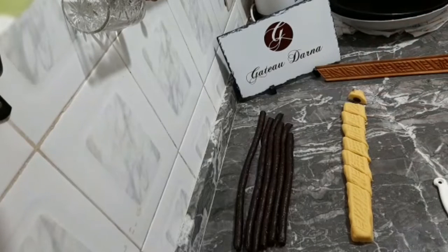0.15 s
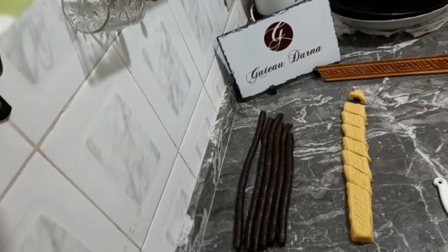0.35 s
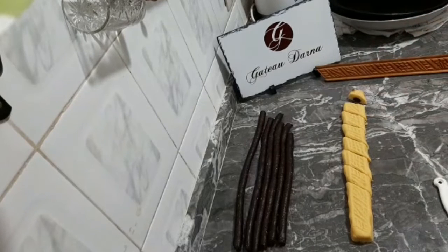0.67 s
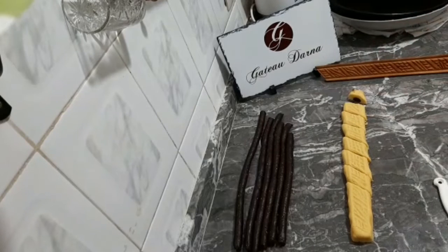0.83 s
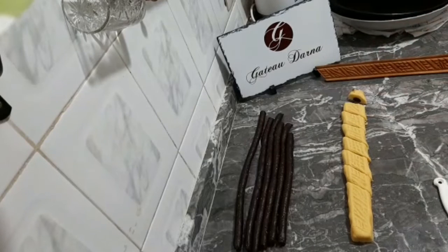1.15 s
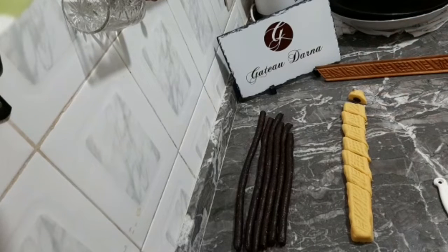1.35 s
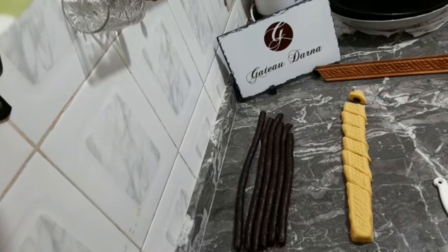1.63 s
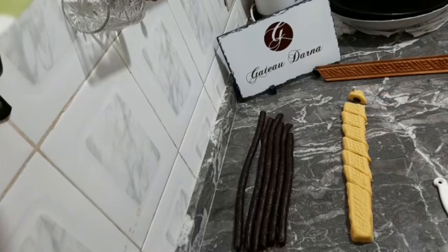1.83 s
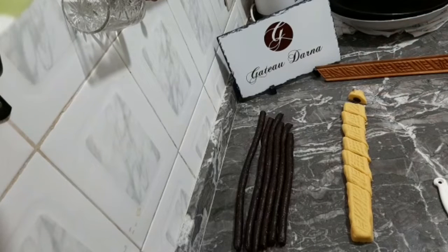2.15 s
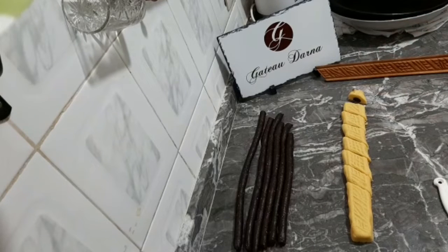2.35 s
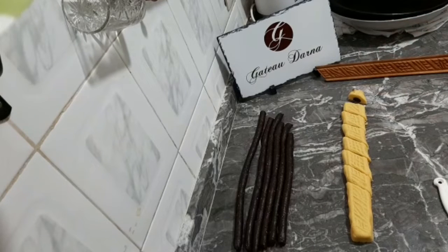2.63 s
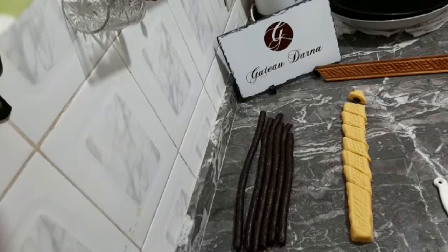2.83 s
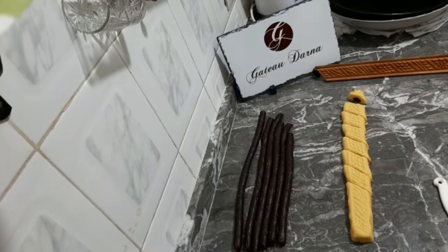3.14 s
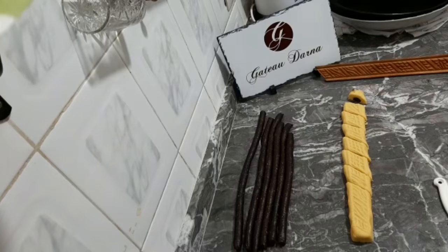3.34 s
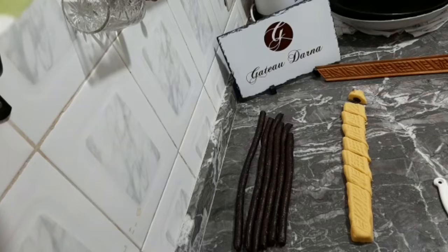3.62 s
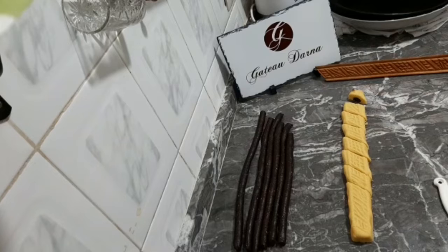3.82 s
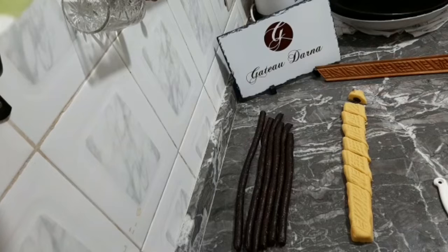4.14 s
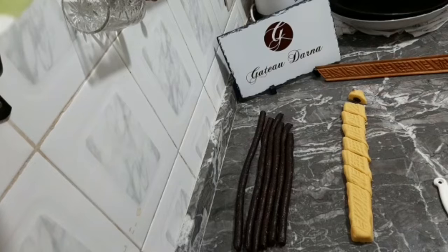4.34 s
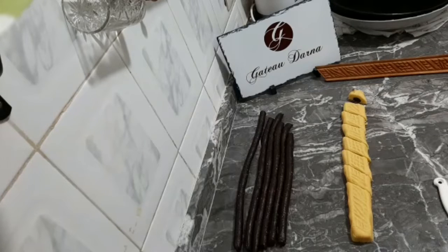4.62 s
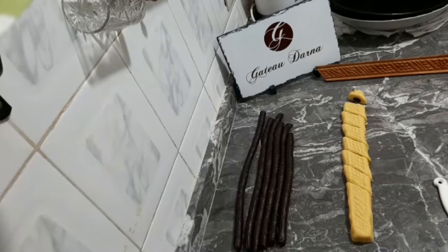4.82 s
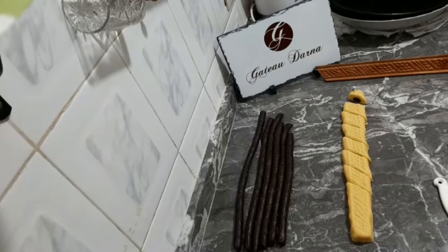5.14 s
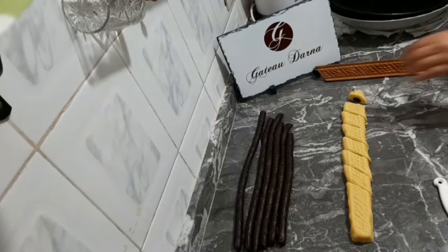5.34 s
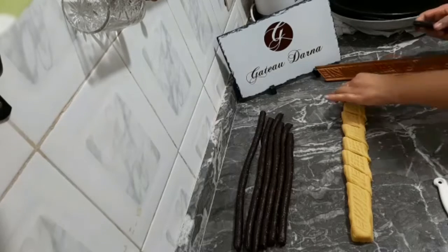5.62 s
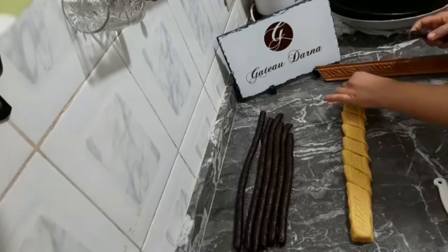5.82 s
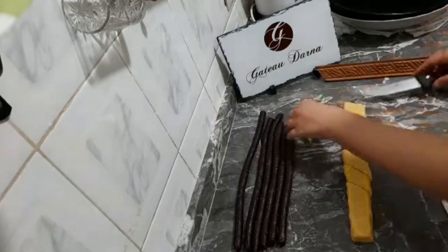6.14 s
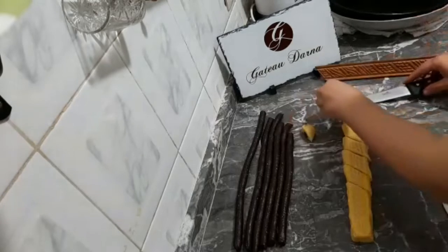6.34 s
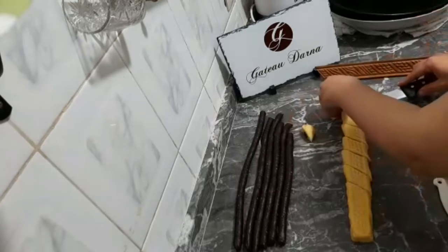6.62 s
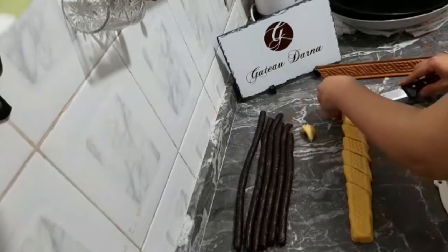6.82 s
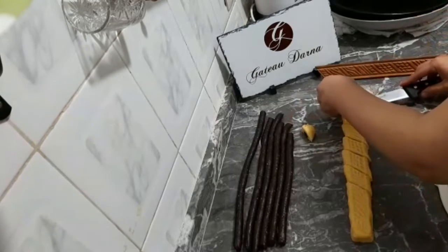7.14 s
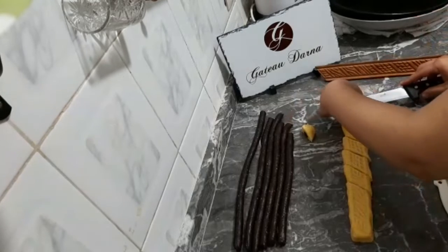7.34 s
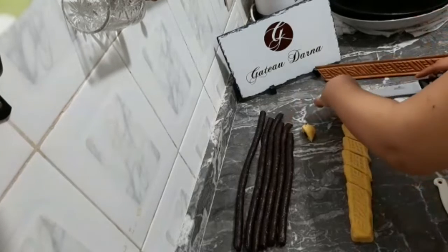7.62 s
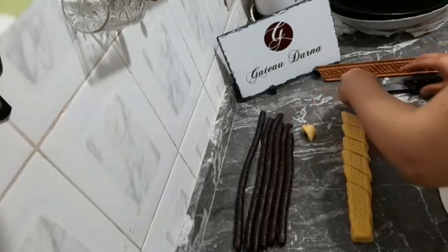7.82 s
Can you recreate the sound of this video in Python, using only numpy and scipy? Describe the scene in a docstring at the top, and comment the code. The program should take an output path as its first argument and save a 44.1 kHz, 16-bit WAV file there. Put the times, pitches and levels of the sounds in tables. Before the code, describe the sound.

For the first second, hands softly brush and bump things on a stone counter. At about 1.5 seconds a wooden cupboard knocks and slides open with a scraping rumble and a thin squeak, banging loudly on its stop at 2.3 seconds, the panels ringing hollowly. Around 2.9 seconds things shift inside with a duller knock and more scraping. From 3.8 seconds it rumbles shut on sticking runners, clattering and briefly squeaking, and bangs loudly again at 4.7 seconds. From 5 seconds it is much quieter: close by, hands rustle over the counter with a couple of tiny bumps. A knife cutting dough clicks lightly on the stone at about 6.5, 7.1 and 7.4 seconds, and its handle knocks softly near 7.8 seconds. The hard, tiled kitchen rings briefly after everything, heard in stereo over a faint, wavering hum.

```python
"""Hands brush and bump things on a counter, then a wooden kitchen cupboard slides open and bangs on its stop.
Things are shifted inside; it rumbles shut on sticking, slipping runners and bangs again, panels and
carcass ringing. Then, close by, hands rustle over the stone counter and a knife clicks on the stone
as it comes through dough. Heard in a hard, tiled kitchen that rings after everything, over a faint hum,
from a pair of microphones 18 cm apart."""
import sys
import numpy as np
from scipy import signal
from scipy.fft import rfft, irfft
from scipy.io import wavfile
from scipy.ndimage import uniform_filter1d

SR = 44100
rng = np.random.default_rng(int(sys.argv[2]) if len(sys.argv) > 2 else 0)


def output_pcm(signal):
    """Save a mono or channel-first signal as 16-bit PCM at the path in sys.argv[1].

    Samples are clipped to [-1, 1] before scaling.
    """
    pcm = np.clip(np.atleast_2d(signal).T, -1, 1) * 32767
    wavfile.write(sys.argv[1], SR, np.round(pcm).astype(np.int16))


N = 351469
HZ = np.fft.rfftfreq(N, 1 / SR)
TIME = np.arange(N) / SR
USUAL_DB = -43  # an ordinary slide or stroke

# Knocks at the cupboard. Each row: start in seconds, then clack, boom, thud and hardness in relative dB.
CUPBOARD_KNOCKS = [(1.491, -46.5, -59.5, -60, 2), (1.536, -34.5, -36, -46.5, 8.5),
                   (2.085, -39.5, -52.5, -34, 0.5), (2.28, -60, -40, -57.5, -6.5),
                   (2.328, -17, -24, -19, 2), (2.341, -15, -16, -15, -1), (2.907, -27.5, -34, -19.5, -9.5),
                   (2.946, -41, -26, -54, 10), (3.365, -51, -42, -42, 8), (3.775, -44.5, -64, -44.5, -14),
                   (3.942, -29.5, -62, -42.5, -2.5), (3.968, -28.5, -52, -25.5, 1.5),
                   (4.056, -21.5, -55, -21.5, 2.5), (4.394, -25, -32.5, -14.5, -45),
                   (4.437, -30.5, -28.5, -45, 0), (4.472, -22, -26, -21, -3.5),
                   (4.56, -36.5, -27.5, -16, 5.5), (4.721, -18, -31.5, -15, -0.5),
                   (4.73, -21.5, -18, -17.5, -1), (4.762, -37, -15, -13.5, -22.5)]
# The tone of a wooden clack. Each row: frequency in Hz, level in dB.
WOOD_TONE = [(40, -23), (130, -7.5), (220, -8.5), (330, 0), (470, 3), (680, -9), (1000, -9.5),
             (1400, -12.5), (2000, -16), (2800, -22), (4200, -25), (5500, -34.5), (10000, -40),
             (16000, -47)]
def cupboard_knocks():
    """Wood strikes wood; the microphones get far more room than direct sound."""
    return blows(CUPBOARD_KNOCKS, WOOD_TONE, direct=0.2, gain_db=33.5, sizzle_db=-0.5, contact_s=0.0095)


# Modes of the cupboard's carcass and panels. Each row: pitch in Hz, level in dB, 60 dB decay in seconds.
CARCASS_MODES = [(52, -13, .14), (65, -21, .5), (77.37, -2, .85), (92.04, -5.5, .7), (98.45, 2, .6),
                 (104, -7.5, 0.2), (121, -10, 0.6), (145.2, -4, .45), (157.2, -11, .25)]
PANEL_MODES = [(237.4, 9.5, 0.14), (277, -5, 0.35), (298.4, -6, 0.65), (344.2, -3.5, 0.25),
               (384.3, -7.5, 0.6), (400, -6.5, 0.14), (458.7, 0, 0.39), (523, -8.5, 0.54), (832, -8, 0.13),
               (954, -11.5, 0.33), (1078, -14.5, 0.28), (1277, -16, .35), (1830, -28, 0.58),
               (2060, -23.5, 0.14)]
def blows(rows, tone, direct, gain_db, sizzle_db, contact_s, firm_db=-22, dull_s=0.008):
    """Each blow clacks into the room, while the panels thud and the carcass booms."""
    out, hz = np.zeros((2, N)), np.fft.rfftfreq(4096, 1 / SR)
    boom = body(CARCASS_MODES, swell_s=0.003, lag=0.7)
    norm = np.linalg.norm(pulse(curve(tone, hz)))
    for start, db, boom_db, thud_db, hard_db in rows:
        # weak blows stay longer in contact and lose their first tick
        contact = contact_s * amp(firm_db - db) ** 0.57
        room = kitchen(direct * np.exp(-contact / dull_s), contact)
        # hard blows are brighter, in clack and panels alike
        edge = [(380, 0), (1100, hard_db), (3500, hard_db), (9000, sizzle_db + 1.1 * hard_db)]
        clack = pulse(curve(tone, hz) + curve(edge, hz)) / norm
        add(out, start, amp(db + gain_db) * convolve(clack, room))
        panels = [(f, mode_db + curve(edge, f), t60) for f, mode_db, t60 in PANEL_MODES]
        thud = body(panels, swell_s=contact, lag=0.6)
        add(out, start, amp(boom_db) * boom + amp(thud_db - 7) * thud)
    return out


# Modes of the end stop. Each row: pitch in Hz, level in dB, 60 dB decay in seconds.
STOP_MODES = [(147.8, -3, .45), (158.5, -4.5, 0.33), (469, 0, .3), (522.3, -6, .3), (1260, -13.5, .35),
              (1900, -16, .4), (1990, -15.5, .38)]
def end_stop(start=2.337, db=-18):
    """Struck once, at full opening, the stop rings with its own hollow notes."""
    out = np.zeros((2, N))
    add(out, start, amp(db) * body(STOP_MODES, swell_s=0.005, lag=0.7))
    return out


# Three slides: open, eased back, shut.
# Each row: time in seconds, effort in dB, extra weight of the rumble in dB.
SLIDE_MOVES = [
    [(1.485, -48.5, -6.5), (1.55, -37, 2), (1.61, -57.5, 4), (1.72, -47, -3), (1.88, -45, 1),
     (2.08, -42.5, 0.5), (2.13, -46.5, 0.5), (2.23, -49, 5.5), (2.31, -53, -2)],
    [(2.8, -57, 10), (2.835, -42, 2), (2.96, -35, 9.5), (3.05, -46, -3), (3.14, -45.5, 1),
     (3.24, -53, -1.5), (3.4, -58.5, 10), (3.5, -67, 18.5), (3.6, -89, 4.5)],
    [(3.66, -89, 24.5), (3.785, -55.5, 16), (3.85, -63, 3), (3.925, -49.5, 0), (3.965, -39, 12.5),
     (4.035, -44, 12), (4.08, -26.5, 8), (4.16, -53.5, 10), (4.26, -43.5, 5.5), (4.4, -38, 2),
     (4.47, -30.5, 8), (4.53, -40.5, 10), (4.6, -43, 3.5), (4.71, -56, 4)],
]
# The tone of the runners. Each row: frequency in Hz, level in dB.
RUNNER_TONE = [(70, -35.5), (130, -4), (220, -9), (340, -0.5), (450, -5.5), (600, -4), (900, -7.5),
               (1400, -7.5), (2000, -12.5), (2800, -15.5), (4700, -19), (7000, -25.5), (10000, -27.5),
               (15500, -34.5)]
def sliding():
    """Wood drags on its runners: rumble, scrape and hiss grow with effort, and squeaks break through."""
    rumble, scrape, hiss = gains = np.zeros((3, N))
    for move in SLIDE_MOVES:
        times, effort, weight = np.transpose(move)
        levels = [effort + weight - 3, effort - 1, -55 + 0.93 * (effort - USUAL_DB)]
        gains += amp([np.interp(TIME, times, db, left=-np.inf, right=-np.inf) for db in levels])
    return box_groan(rumble) + squeaks() + friction(
        [rumble, scrape, hiss], [900, 6000], RUNNER_TONE,
        slips_per_s=700, spread_db=3.5, gain_db=0.5, direct=0.2, judder_db=2.5)


# Modes of the panels, shaken by the sliding. Each row: pitch in Hz, level in dB, 60 dB decay in seconds.
SHAKEN_PANEL_MODES = [(335.2, -5.5, 0.25), (387.5, -0.5, 0.099), (460, -7.5, 0.096), (564, 1.5, 0.16),
                      (686, -6.5, 0.11)]
def box_groan(rumble):
    """The sliding keeps the carcass shaking and sets the panels groaning."""
    out = np.zeros((2, N))
    for modes, db in [(CARCASS_MODES, -10), (SHAKEN_PANEL_MODES, -4)]:
        shake = rng.standard_normal(N) * rumble
        response = body(modes, swell_s=0.01, lag=0.67)
        out += amp(db) * convolve(shake, response / np.linalg.norm(response[0]))
    return out


# Thin squeaks at the runners. Each row: start and length in seconds, pitch and width in Hz, level in dB.
RUNNER_SQUEAKS = [(1.705, 0.12, 10250, 1100, -54), (3.765, 0.079, 5100, 500, -60),
                  (3.933, 0.026, 8900, 300, -52.5), (4.057, 0.027, 4600, 300, -36.5),
                  (4.435, 0.054, 15200, 600, -49)]
def squeaks():
    """Stick-slip chatter in one narrow resonance of a runner."""
    out = np.zeros((2, N))
    for start, length, hz, width, db in RUNNER_SQUEAKS:
        size = round(length * SR)
        resonance = 1 / (1 + ((np.fft.rfftfreq(SR, 1 / SR) - hz) / width) ** 2)
        chatter = unit(irfft(rfft(rng.standard_normal(SR)) * resonance))
        squeak = chatter[:size] * signal.windows.tukey(size, 0.4)
        add(out, start, amp(db) * convolve(squeak, kitchen(direct=0.28)))
    return out


# Bumps at the counter. Each row: start in seconds, then clack, boom, thud and hardness in relative dB.
COUNTER_BUMPS = [(.002, -38, -61, -54, -3.5), (.18, -46.5, -85, -55, -1), (.69, -46.5, -68.5, -49, -0.5),
                 (5.674, -52, -84, -76, -10), (6.033, -54, -87, -78, 8), (7.847, -45, -96, -72, 4)]
# The tone of a bump. Each row: frequency in Hz, level in dB.
COUNTER_TONE = [(30, -45), (60, -23), (180, 2.5), (320, 10), (600, 13.5), (1000, 4.5), (1400, 8.5),
                (2200, 0), (3600, -8), (6000, -1.5), (16000, -5)]
def counter_bumps():
    """Things bump lightly on the stone, and the cupboard answers faintly."""
    return blows(COUNTER_BUMPS, COUNTER_TONE, direct=0.28, gain_db=32, sizzle_db=-17, contact_s=0.0027)


# Cuts, close to the microphones. Each row: start in seconds, ring and click in relative dB,
# direct sound as a ratio to the room, tilt of the ring in dB per octave.
KNIFE_CUTS = [(6.48, -49.5, -51, 0.5, 3.5), (7.113, -48, -40, .1, -4.5), (7.405, -42.5, -43.5, 0.19, 2.5)]
# The tone of the click on stone. Each row: frequency in Hz, level in dB.
CLICK_TONE = [(88, -64), (150, -8), (230, -24), (346, 0.5), (572, -51), (681, -16), (1450, 3.5),
              (1870, -14.5), (2860, 3.5), (3620, -4), (4750, -1), (7130, -0.5), (9180, 1), (15500, -12)]
# Modes of blade and handle. Each row: pitch in Hz, level in dB, 60 dB decay in seconds.
BLADE_MODES = [(1364, -6, .015), (2820, -7, 0.076), (3260, -17, 0.057), (3520, -8.5, 0.049),
               (4910, -2.5, 0.023), (6380, 0, 0.021), (6700, 1.5, 0.02), (7430, -3.5, .025),
               (7890, -5.5, 0.017), (9200, -16, .01), (11500, -14, .01), (13750, -11, .005)]
HANDLE_MODES = [(353, -18, 0.052), (1314, -3, 0.038), (2390, -1, 0.021), (2950, 0, 0.022),
                (3490, 5.5, 0.016), (4500, -7, 0.022)]
def knife(gain_db=33, handle_s=7.848, handle_db=-44.5):
    """The blade clicks on the stone, each angle colouring its brief ring; then the handle knocks."""
    out = np.zeros((2, N))
    click = pulse(curve(CLICK_TONE, np.fft.rfftfreq(16384, 1 / SR)))
    click /= np.linalg.norm(click)
    for start, ring_db, click_db, direct, tilt in KNIFE_CUTS:
        blade = ring([(hz, db + tilt * np.log2(hz), t60) for hz, db, t60 in BLADE_MODES], size=8192)
        hit = amp(ring_db) * blade / np.linalg.norm(blade) + amp(click_db) * click
        add(out, start, convolve(hit, kitchen(direct, early=0.35)))
    handle = ring(HANDLE_MODES, size=8192)
    handle *= amp(handle_db) / np.linalg.norm(handle)
    add(out, handle_s, convolve(handle, kitchen(direct=0.15)))
    return amp(gain_db) * out


# Strokes over the counter, close by.
# Each row: start and length in seconds, level in dB, hiss in dB above that level.
HAND_STROKES = [(0, 0.027, -55, 15), (0.186, 0.1, -65.5, 2), (0.556, 0.13, -58.5, -46),
                (0.736, 0.32, -57, -9), (1.024, 0.077, -46.5, -3), (4.962, 0.16, -62, -11),
                (5.114, 0.075, -59.5, -1.5), (5.426, 0.14, -47.5, -5), (5.595, 0.068, -56, -5.5),
                (5.666, 0.053, -45.5, -4.5), (5.8, 0.31, -69, -9.5), (6.269, 0.094, -58, -7.5),
                (6.476, 0.062, -47.5, -12), (6.97, 0.065, -82.5, 19)]
# The tone of hands and sleeves. Each row: frequency in Hz, level in dB.
CLOTH_TONE = [(71, -30), (120, 2.5), (250, -20), (300, -1), (367, -11.5), (552, -6), (1190, -8.5),
              (1830, -4.5), (4960, -5), (12100, 0), (15500, -8.5)]
def hands():
    """Hands and sleeves rub the stone: each stroke rises, presses a little harder and lets go."""
    gains = np.zeros((4, N))
    for start, length, db, hiss_db in HAND_STROKES:
        progress = np.clip((TIME - start) / length, 0, 1)
        pressure = amp(1.5 * (progress - 0.5)) * envelope(start, length, 0.22 * length, 0.3 * length)
        # low to high: body, brush, sheen, hiss
        levels = [-56.5 + 0.58 * (db - USUAL_DB), db - 4, db + 0.36 * hiss_db, db + hiss_db]
        gains += amp(levels)[:, None] * pressure
    return friction(gains, [900, 2600, 6000], CLOTH_TONE,
                    slips_per_s=4500, spread_db=0, gain_db=0.3, direct=0.35, judder_db=4)


def friction(gains, splits_hz, tone, slips_per_s, spread_db, gain_db, direct, judder_db, judder_hz=35):
    """Countless tiny slips of uneven size; each band between the splits swells with its own gain."""
    sizes = rng.standard_normal(N) * amp(spread_db * np.minimum(rng.exponential(1, N), 3))
    slips = sizes * (rng.random(N) < slips_per_s / SR)
    spectrum = rfft(slips) * amp(curve(tone, HZ))
    highpasses = [1 / (1 + (hz / (HZ + 1)) ** 6) for hz in splits_hz]
    bands = -np.diff(highpasses, axis=0, prepend=1, append=0)
    rub = sum(unit(irfft(spectrum * band, N)) * gain for band, gain in zip(bands, gains))
    # uneven grip makes the level judder
    grip = unit(irfft(rfft(rng.standard_normal(N)) * (HZ < judder_hz), N))
    rub *= unit(amp(judder_db * np.tanh(grip)))
    # the rubbing spot moves, so three room responses take turns
    turns = [np.sqrt(2 / 3) * np.cos(2 * np.pi * (3.1 * TIME + k / 3)) for k in range(3)]
    return amp(gain_db) * sum(convolve(rub * turn, kitchen(direct)) for turn in turns)


# The ring of the tiled kitchen. Each row: frequency in Hz, 60 dB decay in seconds.
KITCHEN_DECAY = [(100, 0.75), (400, 0.3564), (1100, 0.5264), (3000, 0.51), (7000, 0.46), (15000, 0.5)]
def kitchen(direct, rise_s=0.00058, early=0.5, early_s=0.014):
    """The room's response at the pair: a direct pulse, early echoes off the tiles and a dense tail."""
    hz, t, noise = signal.stft(diffuse(size=32768), SR, nperseg=256)
    t60 = curve(KITCHEN_DECAY, hz)[:, None]
    decay = np.exp(-np.log(1000) * t / t60) * (1 + early * np.exp(-t / early_s))
    spectrum = rfft(signal.istft(noise * decay, SR, nperseg=256)[1])
    power = uniform_filter1d((abs(spectrum) ** 2).mean(0), size=121)
    tail = irfft(spectrum / np.sqrt(power))[:, :SR * 2 // 3]
    tail *= np.sqrt(1 - np.exp(-TIME[:tail.shape[1]] / rise_s))
    tail[:, 0] += direct
    return tail / np.sqrt(1 + direct ** 2)


# Room tone, all around the microphones. Each row: frequency in Hz, relative level in dB.
AIR_TONE = [(24, -45), (40, -8), (80, -7.5), (192, -15), (301, -8), (740, -14), (859, -20.5), (1910, -25.5),
            (4130, -34), (6320, -29), (7710, -31.5), (15500, -30)]
# Swells of hum. Each row: start and length in seconds, pitch in Hz, level in dB.
HUM_SWELLS = [(0, 0.32, 309, -54.5), (6.443, 0.38, 543, -66), (6.668, 0.26, 291, -68.5),
              (7.002, 0.27, 523, -70.5), (7.1, .17, 317, -63.5), (7.386, 0.23, 522, -68),
              (7.664, 0.46, 297, -69.5)]
def room_tone(air_db=-72, hum_fade_s=0.11, hum_width=0.046):
    """Quiet room air, and a faint wavering hum that comes and goes in narrow bands."""
    air = rfft(diffuse(size=N))
    out = amp(air_db) * unit(irfft(air * amp(curve(AIR_TONE, HZ)), N))
    for start, length, hz, db in HUM_SWELLS:
        hum = unit(irfft(air / (1 + ((HZ - hz) / (hum_width * hz)) ** 2), N))
        out += amp(db) * envelope(start, length, hum_fade_s, hum_fade_s) * hum
    return out


def diffuse(size, spacing_m=0.18):
    """Noise from all sides at two microphones: alike in the bass, unrelated in the treble."""
    hz = np.fft.rfftfreq(size, 1 / SR)
    left, other = rfft(rng.standard_normal((2, size)))
    coherence = np.sinc(2 * hz * spacing_m / 343)
    right = coherence * left + np.sqrt(1 - coherence ** 2) * other
    return irfft(np.array([left, right]), size)


def ring(modes, size, phase=0):
    """Dying sines of a struck object."""
    t = TIME[:size]
    return sum(amp(db) * np.exp(-np.log(1000) * t / t60) * np.sin(2 * np.pi * hz * t - phase)
               for hz, db, t60 in modes)


def body(modes, swell_s, lag):
    """Modes that build up and reach the right microphone `lag` radians late."""
    pair = np.array([ring(modes, size=SR), ring(modes, size=SR, phase=lag)])
    return pair * (1 - np.exp(-TIME[:SR] / swell_s))


def pulse(spectrum_db):
    """The shortest one-sided pulse that has this spectrum."""
    cepstrum = irfft(np.log(amp(np.maximum(spectrum_db, -100))))
    half = len(cepstrum) // 2
    cepstrum[1:half] *= 2
    cepstrum[half + 1:] = 0
    return irfft(np.exp(rfft(cepstrum)))[:half]


def envelope(start, length, rise, release):
    """Attack, hold and release, in seconds."""
    return np.clip((TIME - start) / rise, 0, 1) * np.clip((start + length - TIME) / release, 0, 1)


def convolve(mono, response):
    """Plays a mono sound through a stereo response."""
    return signal.fftconvolve(mono[None], response, axes=1)[:, :N]


def amp(db):
    """Decibels to gain."""
    return 10 ** (np.asarray(db) / 20)


def unit(x):
    """Scales to rms 1."""
    return x / np.sqrt(np.mean(x ** 2) + 1e-20)


def curve(points, hz):
    """Reads (Hz, value) points on a log-frequency axis."""
    f, value = np.transpose(points)
    return np.interp(np.log(hz + 1), np.log(f), value)


def add(mix, start, sound):
    """Mixes a stereo sound in at `start` seconds."""
    part = mix[:, round(start * SR):][:, :sound.shape[1]]
    part += sound[:, :part.shape[1]]


def scene():
    """Cupboard, counter, knife and hands in one kitchen."""
    cupboard = cupboard_knocks() + end_stop() + sliding()
    return cupboard + counter_bumps() + knife() + hands() + room_tone()


# Balance of the microphone pair. Each row: frequency in Hz, left minus right in dB.
PAIR_BALANCE = [(110, 6), (200, 4.5), (380, -0.5), (700, 5), (1300, 0.96), (2400, 0), (4400, 1.7),
                (15000, -1.5)]
def record(dry, low_hz=42, top_hz=15850, ceiling=0.9):
    """The left microphone takes more bass; deep rumble is cut, peaks are rounded, the very top is cut."""
    balance_db = np.array([[0.5], [-0.5]]) * curve(PAIR_BALANCE, HZ)
    tilted = irfft(rfft(dry) * amp(balance_db), N)
    cut = signal.sosfilt(signal.butter(2, low_hz, "highpass", fs=SR, output="sos"), tilted)
    rounded = cut / (1 + (cut / ceiling) ** 6) ** (1 / 6)
    lowpass = signal.firwin(511, top_hz, window=("kaiser", 9), fs=SR)
    return signal.oaconvolve(rounded, lowpass[None], "same")


dry = scene()
out = record(dry)
output_pcm(out)
```